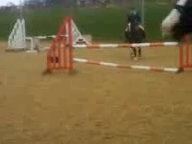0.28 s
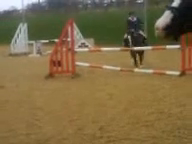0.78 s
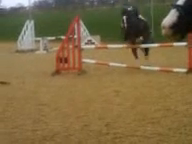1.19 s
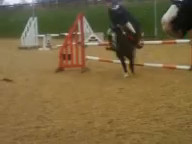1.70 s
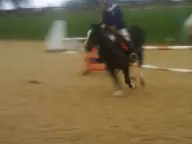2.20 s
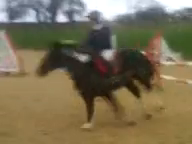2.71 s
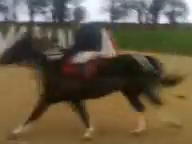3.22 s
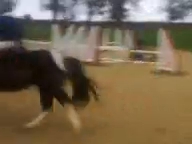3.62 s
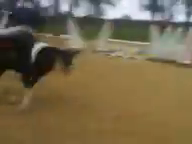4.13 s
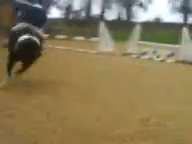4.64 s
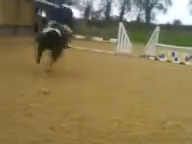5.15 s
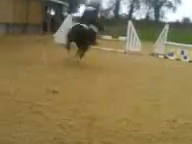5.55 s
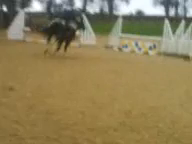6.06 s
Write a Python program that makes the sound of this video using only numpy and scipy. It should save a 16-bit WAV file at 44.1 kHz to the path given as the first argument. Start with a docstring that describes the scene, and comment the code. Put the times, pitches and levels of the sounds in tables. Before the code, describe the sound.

A small, telephone-band microphone picks up a pony cantering on sand. After two tiny hard ticks and a burst of popping wind, coarse hoof crunches arrive steadily, the early ones duller with more thud, later ones grittier. Long hissy tails blend them together. Loose sand brushes softly between strides, gusts rumble, and the strongest landing clips flat and crackles. Faint open-air hiss lies underneath.

```python
"""A sand arena outdoors: a pony canters past a small narrow-band microphone.
Each stride is a gritty crunch of sand grains with a short resonance, over a dull thud of low noise;
a long, patchy wash of noise dies away after it. Loose sand brushes softly; two dry ticks ring close by.
Wind gusts rumble and flutter on the microphone, and single buffets pop; over all lies a faint hiss
of open air. The hardest strides overload the microphone and are clipped flat."""
import sys
import numpy as np
from scipy import signal
from scipy.fft import rfft, irfft, next_fast_len
from scipy.io import wavfile

SR = 44100
rng = np.random.default_rng(int(sys.argv[2]) if len(sys.argv) > 2 else 0)


def waveform_to_disk(signal):
    """Save audio, clipped to [-1, 1], as 16-bit WAV at the path in sys.argv[1]."""
    frames = np.transpose(np.atleast_2d(signal))
    scaled = np.clip(frames, -1, 1) * 32767
    samples = np.round(scaled).astype(np.int16)
    wavfile.write(sys.argv[1], SR, samples)


N = 279682
TIME = np.arange(N) / SR  # s

# Hoof landings: t/s, crunch level/dB, thud level/dB, wash level re crunch/dB, resonance f/Hz,
# extra level of the lows/dB
STRIDES = [(1.378, -19, -20, -6, 2817, 7), (2.085, -12, -19.5, -5.5, 2784, 3.5),
           (2.659, -5, -29, -9, 2234, 1.5), (3.296, -9, -22, -7.5, 2610, -2),
           (3.876, -16, -41.5, -8, 2575, 3), (4.375, -15.5, -39, -2.5, 2490, -0.5),
           (5.092, -8.5, -27.5, -8, 2710, -2.5), (5.615, 1, -21.5, -9, 2791, -5.5),
           (6.186, -11, -24.5, -5, 2826, -3)]
# Light brushes of sand: t/s, level/dB, swell length/s
SAND_SCUFFS = [(0.082, -50, .022), (2.076, -39, 0.0068), (4.352, -42, 0.019), (4.695, -36.5, 0.018),
               (4.86, -38, 0.04), (5.02, -43, 0.078), (6.007, -31, 0.02)]
# Course of the light breeze, before its lumps: t/s, level/dB
BREEZE_LEVEL = [(0, -42), (.2, -69), (.45, -67), (.55, -33.5), (1.3, -47.5), (2.1, -46.5), (2.55, -61.5),
                (2.8, -46), (3.15, -67.5), (3.5, -43), (3.95, -52), (5.5, -48.5), (6.3, -37.5)]
# Gusts on the microphone, before their lumps: start t/s, hold/s, level/dB
GUSTS = [(0.493, 0.26, -37.5), (0.716, 0.084, -27), (0.836, 0.2, -37.5), (0.936, 0.022, -27.5),
         (1.224, 0.025, -39), (1.715, 0.054, -35), (1.803, 0.01, -25), (2.124, 0.15, -33),
         (3.338, 0.079, -22.5), (3.616, 0.22, -37.5), (4.066, .04, -44.5), (4.243, 0.079, -41.5),
         (4.419, 0.13, -24), (4.621, 0.22, -31), (4.911, 0.012, -24.5), (5.08, .03, -29.5),
         (5.137, 0.096, -24), (5.847, 0.075, -25.5), (6.198, 0.11, -29.5)]
# Single wind buffets: t/s, envelope peak level/dB, f/Hz
BUFFETS = [(.498, -18, 236), (0.556, -21.5, 500), (.614, -21.5, 320), (0.659, -22.5, 640),
           (.702, -18.5, 540), (0.723, -21.5, 1050), (.732, -10.5, 364), (.787, -15, 780), (.878, -13, 300),
           (.945, -22, 645), (0.982, -16, 234), (1.803, -18, 270), (1.817, -14, 860), (4.695, -14, 530),
           (4.912, -24, 570), (5.905, -15.5, 550)]
# Ticks close by: t/s, level of the exciting click/dB
TICKS = [(0.0246, -15.5), (0.1204, -20.5)]
# Ringing modes of a tick: f/Hz, level re click/dB, t60/s
TICK_MODES = [(550, -14.5, 0.0085), (1244, -9, 0.021), (1900, -4, 0.014), (2250, -3, 0.012),
              (3170, -9.5, 0.0064)]

# Spectrum shapes, each with columns: f/Hz, relative level per Hz/dB
# Sand grains crushed under the hoof, also the grit behind a tick
CRUNCH_SPECTRUM = [(200, -9), (480, -5.5), (750, -8.5), (1050, -2), (1400, -1.5), (1600, -1.5), (1870, 4),
                   (2100, -1), (2450, -1), (2900, -1.5), (3400, -6.5), (3750, -20)]
# The long wash after a landing
WASH_SPECTRUM = [(100, -12), (250, -6), (480, 1.5), (750, 0.5), (1050, 0), (1400, 3.5), (2000, 3),
                 (2400, 3.5), (2800, 3), (3150, -1), (3500, -13), (4000, -16)]
# The ground's thud
THUD_SPECTRUM = [(25, -24), (50, -9), (100, -10.5), (200, -3), (350, 0.5), (500, 1), (800, -19)]
# Loose sand brushed
SCUFF_SPECTRUM = [(500, -0.5), (1500, -6.5), (2300, 2.5), (2850, 0.5), (3400, -10.5), (4000, -18)]
# Full wind rumble on the microphone
GUST_SPECTRUM = [(30, -37), (50, -10.5), (100, 1), (170, 0), (300, 1), (500, -6), (800, -23), (1300, -29.5),
                 (2200, -40)]
# Small eddies shed by strong wind
EDDY_SPECTRUM = [(150, -7), (400, -0.5), (650, 2.5), (950, -8.5), (1400, -22), (2000, -31.5)]
# Open-air hiss
AIR_SPECTRUM = [(25, -8), (120, 0.5), (300, 1), (700, -1), (1400, 2.5), (2500, 1.5), (3200, -2.5),
                (4000, -14.5)]

CRUNCH_T60_S, WASH_T60_S, THUD_T60_S = 0.24, 0.94, 0.47
SINK_S = 0.017  # a hoof takes this long to come under full load
TOUCH_SHARE, TOUCH_S = 0.39, 0.009  # first touch of a blow: share of full height, and its rise time
FULLNESS_HZ = 1300  # corner below which landings sound fuller or thinner

GUST_RISE_DB_PER_S, GUST_FALL_DB_PER_S = 701, 652  # before the lumps
GUST_FULL_DB = -29.5  # from this level on the wind sounds in full
BREEZE_BAND_HZ = (54, 240)  # light wind mostly rumbles in this band
EDDY_DB, EDDY_GROWTH = 11, 1.676  # eddy level at 0 dB of wind; dB of eddies per dB of wind
BUFFET_CYCLES = 0.63  # a buffet falls to 1/e on either side of its tip in this many cycles

AIR_DB = -61.5
MIC_TOP_HZ, OVERLOAD, CUTOFF_HZ = 3767, 0.73, 16000  # OVERLOAD is the clipping height, full scale 1


def hooves():
    """A hoof crushes grains as it sinks in, the ground thuds, and a wash of noise trails off."""
    crunch = coloured(grains(per_s=9000, spread_db=2.5), CRUNCH_SPECTRUM)
    spray = coloured(grains(per_s=7000, spread_db=3.5), WASH_SPECTRUM)
    wash = patchy(spray, depth_db=2.1, rate_hz=14)
    thud = noise(THUD_SPECTRUM)
    out = np.zeros(N)
    for start, crunch_db, thud_db, wash_db, hz, lows_db in STRIDES:
        # noise excites one short resonance, a little different at every landing
        clack = from_db(-2.5) * rms_one(ring(rng.standard_normal(N), hz, t60=0.03))
        crush = blow(start, SINK_S, CRUNCH_T60_S) * (crunch + clack)
        trail = from_db(wash_db) * blow(start, SINK_S, WASH_T60_S) * wash
        sand = crush + trail
        # some landings sound fuller, others thinner
        lows = signal.lfilter(*signal.butter(1, FULLNESS_HZ, fs=SR), sand + 1e-18)
        out += from_db(crunch_db) * (sand + (from_db(lows_db) - 1) * lows)
        out += from_db(thud_db) * blow(start, rise=0.0035, t60=THUD_T60_S) * thud
    return out


def scuffs():
    """Soft brushes of loose sand swell and fade: uneven grains under bell-shaped envelopes."""
    swell = np.zeros(N)
    for centre, db, length in SAND_SCUFFS:
        swell += from_db(db) * np.exp(-((TIME - centre) / length) ** 2)
    return swell * coloured(grains(per_s=10000, spread_db=5.5), SCUFF_SPECTRUM)


def ticks():
    """Something small and hard ticks near the microphone: ringing modes and a short gritty tail."""
    clicks, tail = np.zeros((2, N))
    for start, db in TICKS:
        clicks[round(start * SR)] = from_db(db)
        tail += from_db(db - 21.5) * blow(start, rise=0.0055, t60=0.038)
    body = np.zeros(N)
    for k, (hz, db, t60) in enumerate(TICK_MODES):
        body += (-1) ** k * from_db(db) * ring(clicks, hz, t60)  # signs alternate
    return body + tail * noise(CRUNCH_SPECTRUM)


def buffets():
    """Single eddies hit the microphone port, each a sharp-tipped pop of a cycle or two."""
    out = np.zeros(N)
    phases = rng.uniform(0, 2 * np.pi, len(BUFFETS))
    for (centre, db, hz), phase in zip(BUFFETS, phases):
        near = np.abs(TIME - centre) < 0.03
        cycles = (TIME[near] - centre) * hz
        envelope = from_db(db) * np.exp(-np.abs(cycles) / BUFFET_CYCLES)
        out[near] += envelope * np.cos(2 * np.pi * cycles + phase)
    return out


def wind():
    """Lumpy rumble at the port, gusts over a breeze; stronger wind sheds more fluttering, brighter eddies."""
    lumps_db = 2.1 * drift(rate_hz=55)
    breeze = from_db(np.interp(TIME, *np.transpose(BREEZE_LEVEL)))
    strongest = np.max([breeze] + [gust(*row) for row in GUSTS], axis=0)
    level = strongest * from_db(lumps_db)
    full = noise(GUST_SPECTRUM)
    band = signal.butter(1, BREEZE_BAND_HZ, "band", fs=SR, output="sos")
    dull = rms_one(signal.sosfilt(band, full))
    force = np.minimum(level / from_db(GUST_FULL_DB), 1)
    rumble = force * full + (1 - force) * dull
    eddies = coloured(grains(per_s=400, spread_db=4.0), EDDY_SPECTRUM)
    return level * rumble + from_db(EDDY_DB) * level ** EDDY_GROWTH * eddies


def gust(start, hold, db):
    """The level of one gust: a quick swell, a hold and a slower drop."""
    early = np.maximum(start - TIME, 0)
    late = np.maximum(TIME - start - hold, 0)
    return from_db(db - GUST_RISE_DB_PER_S * early - GUST_FALL_DB_PER_S * late)


def open_air():
    """Faint hiss of open air, its narrow bands wavering independently."""
    return from_db(AIR_DB) * patchy(noise(AIR_SPECTRUM), depth_db=5.5, rate_hz=8.4)


def blow(start, rise, t60):
    """An envelope that rises quickly from first touch, builds up to 1 under load, then dies away."""
    age = np.clip(TIME - start, 0, 2)
    touch = TOUCH_SHARE * np.minimum(age / TOUCH_S, 1)
    load = np.minimum(age / rise, 1) ** 1.32
    decay = from_db(-60 * np.maximum(age - rise, 0) / t60)
    return np.maximum(touch, load) * decay


def ring(clicks, hz, t60):
    """A two-pole resonator: a unit click sets a decaying sine of starting height 1 ringing."""
    r = from_db(-60 / (t60 * SR))  # decay per sample
    w = 2 * np.pi * hz / SR
    return signal.lfilter([0, np.sin(w)], [1, -2 * r * np.cos(w), r * r], clicks + 1e-18)


def grains(per_s, spread_db):
    """Random clicks of either sign and uneven size, like colliding grains."""
    hits = rng.random(N) < per_s / SR
    return hits * rng.choice([-1, 1], N) * from_db(spread_db * rng.standard_normal(N))


def patchy(x, depth_db, rate_hz, count=14):
    """Each narrow band swells and fades by itself, so the colour keeps shifting; rms 1."""
    size = next_fast_len(N)
    spectrum, f = rfft(x, size), np.fft.rfftfreq(size, 1 / SR)
    centres = np.linspace(0, MIC_TOP_HZ, count)
    out = np.zeros(N)
    for one in np.eye(count):
        # overlapping triangular bands
        band = irfft(spectrum * np.interp(f, centres, one), size)[:N]
        out += band * from_db(depth_db * drift(rate_hz))
    return rms_one(out)


def drift(rate_hz):
    """Slow chance: low-passed noise with rms 1, drawn at every 40th sample."""
    r = np.exp(-2 * np.pi * rate_hz * 40 / SR)
    white = rng.standard_normal(N // 40 + 2002)
    slow = signal.lfilter([1], [1, -2 * r, r * r], white)[2000:]  # skip the filter's start
    return np.interp(np.arange(N) / 40, np.arange(len(slow)), rms_one(slow))


def noise(spectrum):
    """Smooth noise with a spectrum; rms 1."""
    return coloured(rng.standard_normal(N), spectrum)


def coloured(x, spectrum):
    """Shape a steady signal by a spectrum that falls off beyond its first and last points; rms 1."""
    hz, db = np.transpose(spectrum)
    size = next_fast_len(N)
    f = np.maximum(np.fft.rfftfreq(size, 1 / SR), 1)
    gain = from_db(np.interp(np.log(f), np.log(hz), db))
    gain *= np.minimum(1, hz[-1] / f) ** 4  # steep above the last point
    gain *= np.minimum(1, f / hz[0])  # gentle below the first
    return rms_one(irfft(rfft(x, size) * gain, size)[:N])


def rms_one(x):
    """Scale to unit rms."""
    return x / np.sqrt(np.mean(x ** 2) + 1e-20)


def from_db(db):
    """Decibels to gain."""
    return 10 ** (np.asarray(db) / 20)


def scene():
    """Hooves, sand, ticks and wind over the hiss of open air, in mono."""
    return (hooves() + scuffs() + ticks() + buffets() + wind() + open_air())[None]


def record(dry):
    """A telephone-wide microphone; peaks are clipped flat, which spits treble; the top is cut."""
    narrow = signal.sosfilt(signal.butter(N=15, Wn=MIC_TOP_HZ, fs=SR, output="sos"), dry)
    clipped = np.clip(narrow, -OVERLOAD, OVERLOAD)
    top_cut = signal.ellip(10, 0.05, 60, CUTOFF_HZ, fs=SR, output="sos")
    return signal.sosfiltfilt(top_cut, clipped)


dry = scene()
out = record(dry)
waveform_to_disk(out)
```